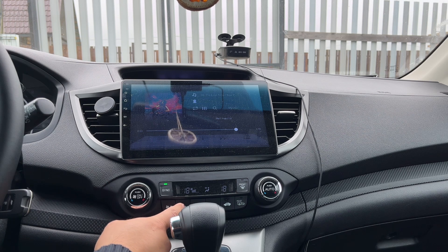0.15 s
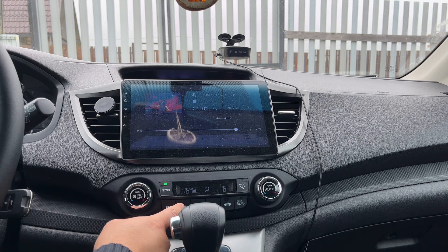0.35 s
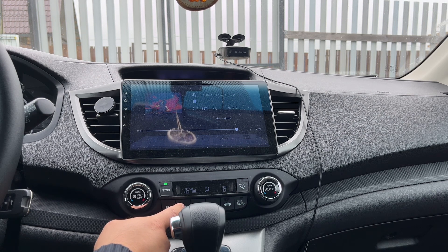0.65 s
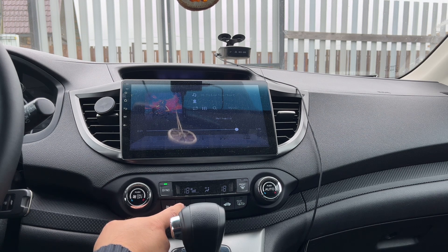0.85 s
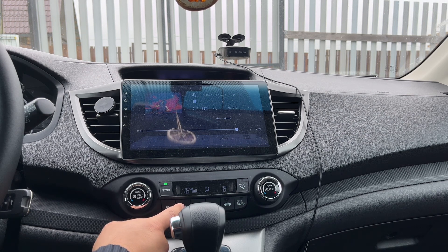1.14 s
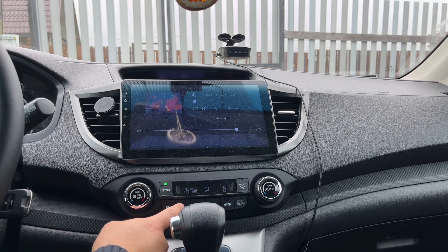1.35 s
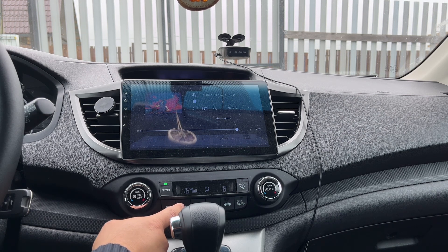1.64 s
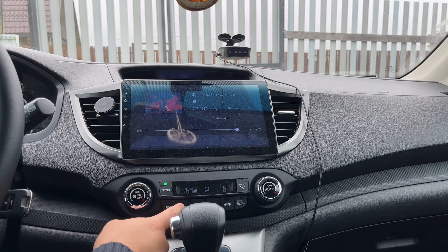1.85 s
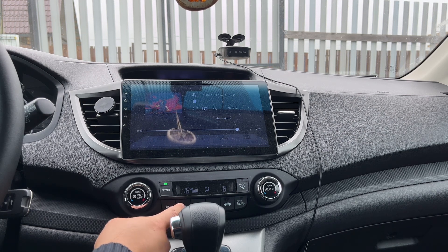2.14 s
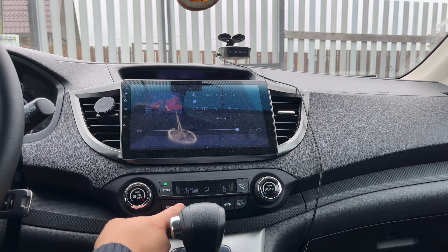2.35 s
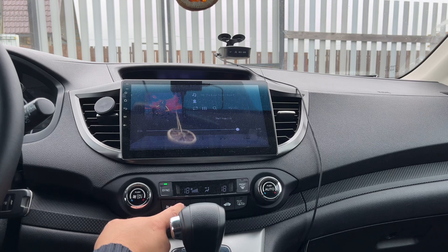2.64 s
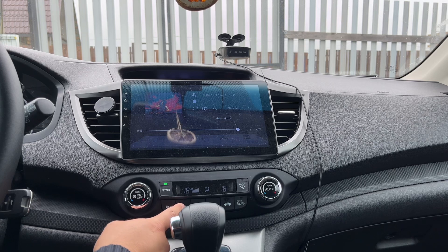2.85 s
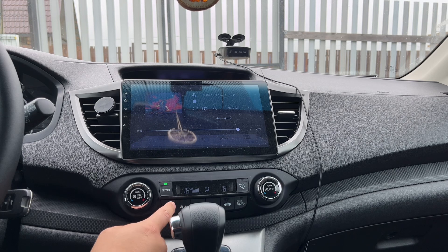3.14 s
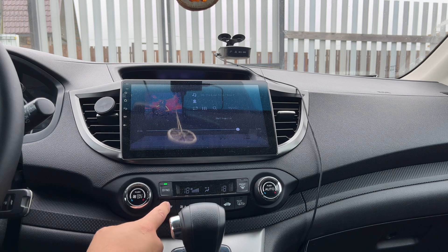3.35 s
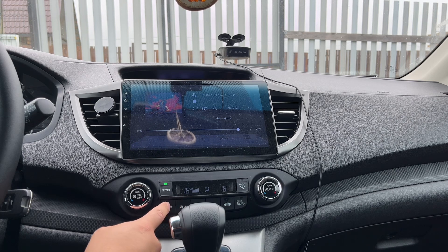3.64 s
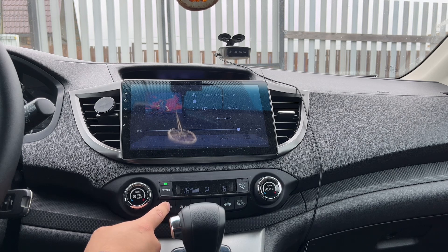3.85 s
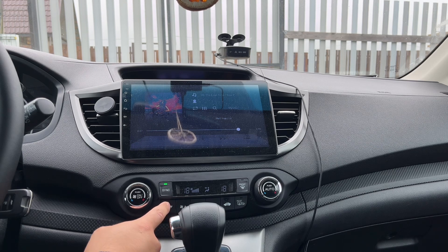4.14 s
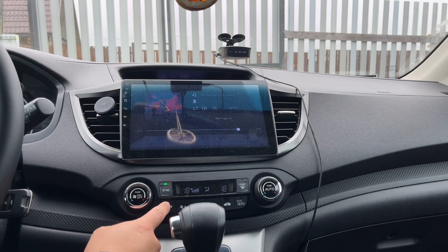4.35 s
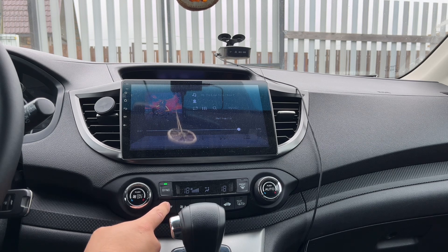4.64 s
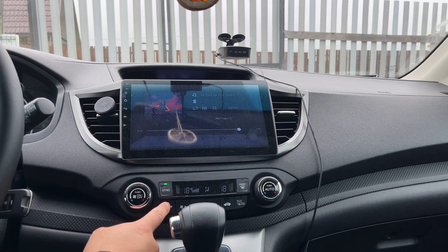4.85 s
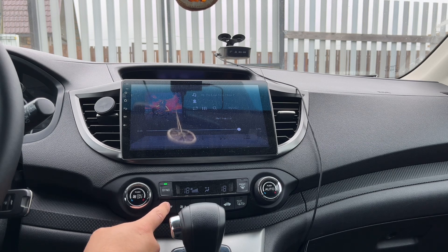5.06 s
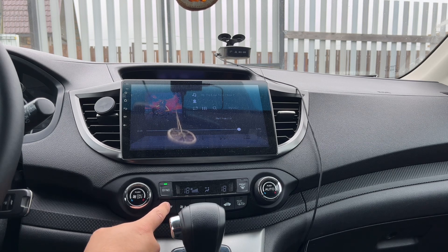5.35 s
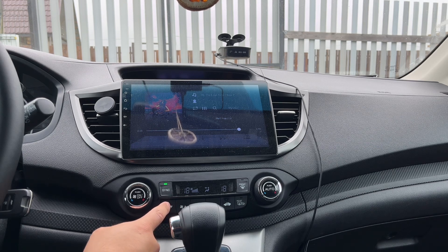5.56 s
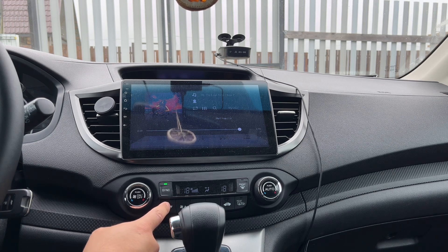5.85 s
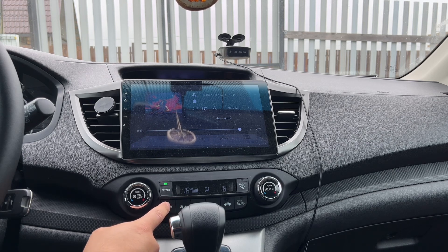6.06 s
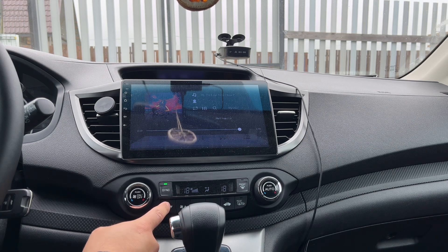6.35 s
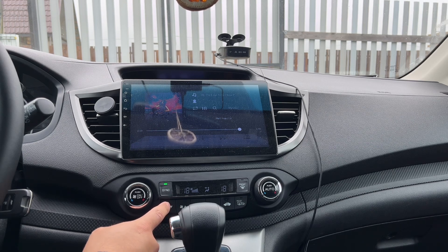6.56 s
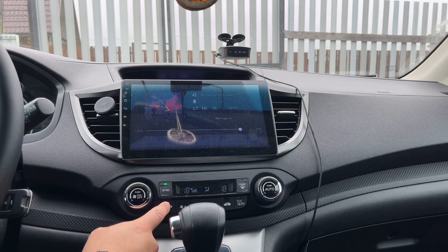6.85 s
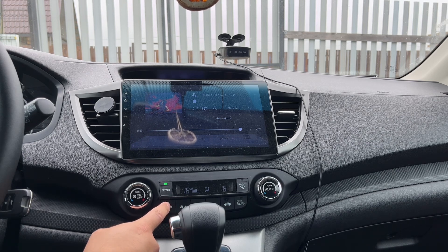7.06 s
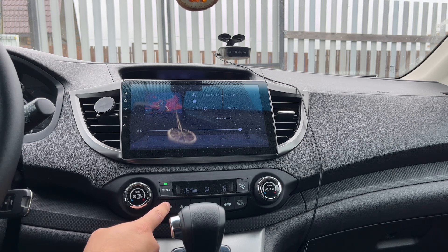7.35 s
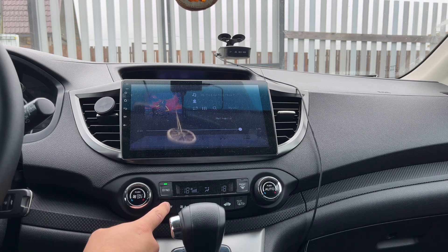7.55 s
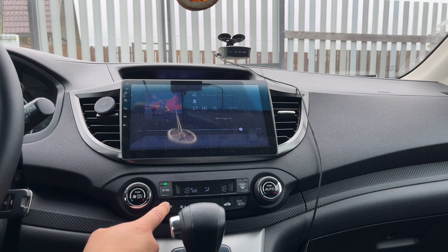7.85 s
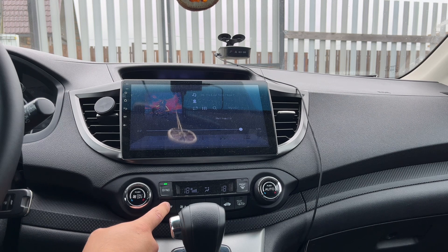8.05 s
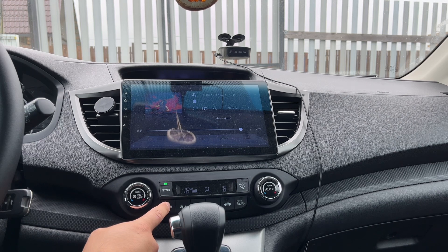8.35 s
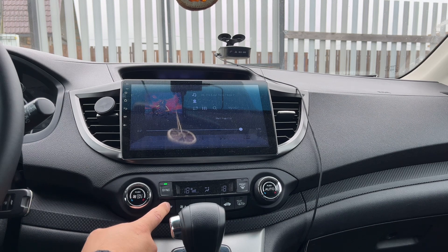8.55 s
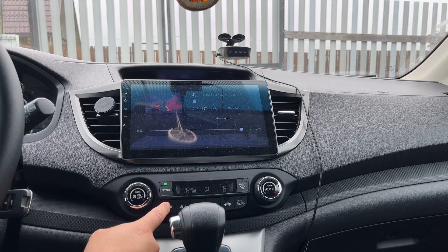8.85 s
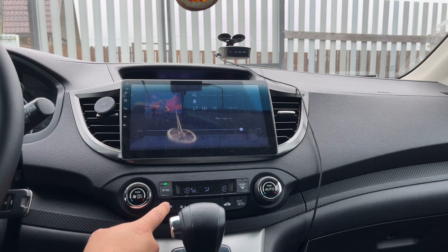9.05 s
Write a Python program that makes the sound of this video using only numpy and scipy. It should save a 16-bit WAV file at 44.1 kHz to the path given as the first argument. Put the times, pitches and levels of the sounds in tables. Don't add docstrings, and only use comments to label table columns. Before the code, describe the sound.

Close inside a parked car with the windows shut, a dashboard fan climbs quickly through three settings. Rushing air from the vents grows louder and brighter, with low, irregular gusts thumping in the cabin and a faint motor hum beneath. After a few seconds at full blast a tiny button click is heard, and the fan slows in two steps. Stereo microphone near the left vents; dull murmur outside.

```python
import sys
import numpy as np
from scipy import signal
from scipy.fft import rfft, irfft
from scipy.io import wavfile
from scipy.ndimage import uniform_filter1d

SR = 44100
rng = np.random.default_rng(int(sys.argv[2]) if len(sys.argv) > 2 else 0)


def how_loud(loudness_db):
    steps = np.asarray(loudness_db, float) / 20
    return 10 ** steps


def pcm_store(signal):
    levels = np.round(np.clip(np.atleast_2d(signal), -1, 1) * 32767)
    wavfile.write(sys.argv[1], SR, levels.astype(np.int16).T)


N = 405719


def evened(x):
    return x / np.sqrt(np.mean(x ** 2) + 1e-20)


def smoothed(x, width, axis=-1):
    width = int(width)
    return uniform_filter1d(uniform_filter1d(x, width, axis=axis), width, axis=axis)


def drift(count, width):
    return evened(smoothed(rng.standard_normal(count), width))


def read(points, hz):
    f, value = np.transpose(points)
    return np.interp(np.log(hz + 1), np.log(f + 1), value)


# frequency in Hz, likeness from 0 to 1.
SAME = [(40, .975), (110, .97), (330, .92), (410, .25), (560, .55), (800, .55), (1150, .1), (1400, .55),
        (1750, .85), (3300, .7), (3800, .45), (4500, .68), (7000, .58), (7900, .94), (9000, .92),
        (10600, .8), (11500, .95), (13000, .93), (14000, .8)]
# frequency in Hz, lead of the left in radians.
LEAD = [(330, .15), (520, 5.8), (1230, 5.8), (1400, 9.4), (1620, 9.8), (1750, 12.6), (3000, 13.5),
        (4900, 13.1), (7200, 11.1), (8050, 9.7), (8900, 9.2), (11000, 6.7), (13000, 5.9), (15200, 3.2)]
# frequency in Hz, left minus right in dB.
TILT = [(40, .7), (110, 1.6), (235, .9), (290, 3), (500, 5), (600, 3), (850, 5.6), (1000, 2), (1170, 4),
        (1400, -1.5), (1900, 1.1), (3000, 1.2), (4600, 4.5), (6500, .1)]


def ports(left, other, hz):
    same = np.clip(read(SAME, hz), 0, 1)
    shared = same * left * np.exp(-1j * read(LEAD, hz))
    right = shared + np.sqrt(1 - same ** 2) * other
    half_tilt_db = read(TILT, hz) / 2
    return np.array([left * how_loud(half_tilt_db), right * how_loud(-half_tilt_db)])


def noise(db, frames, size):
    a, b, c, d = rng.standard_normal((frames, size // 2 + 1, 4)).T
    hz = np.fft.rfftfreq(size, 1 / SR)[:, None]
    return ports(a + 1j * b, c + 1j * d, hz) * how_loud(db)


def overlap_add(spectra, size, hop):
    return signal.istft(spectra, nperseg=size, noverlap=size - hop)[1]


START_HZ, FULL_HZ = 29, 45.75
LAG_S = .15
# time in seconds, shaft speed the motor is sent to in Hz.
SETTINGS = [
    (.17, 36.1),
    (1.18, 40.85),
    (2.06, 45.75),
    (6.82, 40.85),
    (8.52, 35.9),
]


def shaft_hz(t):
    hz, before = START_HZ + 0 * t, START_HZ
    for s, sent in SETTINGS:
        hz = hz + (sent - before) * (1 - np.exp(-np.maximum(t - s, 0) / LAG_S))
        before = sent
    return hz


# frequency in Hz, level in dB.
AIR = [(30, -43), (45, -27.5), (80, -23), (125, -17.5), (150, -11.5), (180, -14), (240, -18), (600, -14.5),
       (1100, -10.5), (2700, -20.5), (5500, -24.5), (8000, -24), (13500, -29), (16000, -32)]
# frequency in Hz, width in Hz, height in dB.
DUCTS = [(330, 116, 4.5), (464, 24, 5.5), (530, 40, 1), (663, 42, -3), (753, 81, 4), (902, 100, 3),
         (1130, 74, -9), (1240, 32, 4.5), (1545, 86, 5), (1640, 230, 1), (2240, 68, 4), (2810, 180, 2.5),
         (3440, 110, 4), (4430, 1200, 4.5), (4840, 470, 3)]
# frequency in Hz, exponent (no unit).
GROWTH = [(40, 1.9), (75, 0.43), (170, 3.36), (500, 3.3), (3000, 3.8), (5000, 4.65), (7000, 5.2),
          (12000, 6.4)]
AIR_DB = -32


def air():
    size, hop = 2048, 512
    frames, hz = N // hop + 5, np.fft.rfftfreq(size, 1 / SR)
    colour_db = read(AIR, hz) - 20 * np.log10(hz + 1)
    for f, width, db in DUCTS:
        colour_db += db / (1 + (2 * (hz - f) / width) ** 2)
    patches = rng.standard_normal((frames, len(hz))).T
    patches = evened(uniform_filter1d(uniform_filter1d(patches, 20, axis=0), 6, axis=1))
    spectra = noise(colour_db[:, None] + 0.85 * patches, frames, size)
    full = overlap_add(spectra, size, hop)
    speed = shaft_hz(np.arange(frames) * hop / SR) / FULL_HZ
    grown = spectra * speed ** read(GROWTH, hz)[:, None] / np.sqrt(np.mean(full ** 2))
    return how_loud(AIR_DB) * overlap_add(grown, size, hop)[:, :N]


# frequency in Hz, level in dB per Hz.
CABIN = [(30, -48), (60, -8), (75, -5), (95, 0.5), (116, 1.5), (130, -4.5), (150, -20.5), (250, -120)]
# time in seconds, rms at the crest in dB, length in
# seconds.
SURGES = [(0.713, -33.5, 0.083), (1.176, -36, 0.1), (1.307, -32, 0.037), (1.403, -29.5, 0.034),
          (1.526, -32, 0.041), (1.686, -34, 0.085), (1.907, -37.5, 0.23), (2.11, -32, 0.089),
          (2.25, -28.5, 0.054), (2.372, -33, 0.034), (2.868, -28, 0.048), (3.01, -31.5, 0.068),
          (3.144, -33, 0.057), (3.255, -30.5, 0.083), (3.5, -32.5, 0.13), (3.695, -33.5, 0.067),
          (4.1, -32, 0.11), (4.306, -30.5, 0.054), (4.75, -30, 0.077), (4.95, -30, 0.088),
          (5.1, -30.5, 0.17), (5.352, -32.5, .1), (5.513, -31.5, 0.11), (5.986, -30.5, 0.071),
          (6.49, -31, 0.063), (6.843, -34, 0.032), (6.997, -33, 0.14), (7.42, -34, 0.068), (7.8, -36, 0.16),
          (8.45, -30, 0.054)]
LULL_DB, LULL_POWER, LULL_WANDER_DB = -35.5, 1.68, 2


def boom():
    size, hop = 8192, 2048
    frames, hz, t = N // hop + 5, np.fft.rfftfreq(size, 1 / SR), np.arange(N) / SR
    lean = (FULL_HZ / shaft_hz(np.arange(frames) * hop / SR)) ** 0.3
    spectra = noise(read(CABIN, np.outer(hz, lean)), frames, size)
    ring = overlap_add(spectra, size, hop)[:, :N]
    own_power = smoothed(ring.mean(0) ** 2, 2600)
    lull = how_loud(LULL_DB + LULL_WANDER_DB * drift(N, 2500)) * (shaft_hz(t) / FULL_HZ) ** LULL_POWER
    surges = sum(how_loud(db) ** 2 * np.exp(-(2 * (t - s) / length) ** 2) for s, db, length in SURGES)
    return ring * np.sqrt((lull ** 2 + surges) / (own_power + 1e-20))


# multiple of shaft speed (no unit), wavering in dB, left minus right in dB.
ORDERS_DB = [
    (1, 1.2, .8),
    (12, 1.0, 1.5),
    (24, 2.0, 5.0),
]
# frequency in Hz, rms in dB.
DASH = [(30, -56), (36, -50), (43, -52), (45.75, -42), (433, -66), (490, -61), (549, -53), (760, -70),
        (865, -60), (980, -67), (1100, -70)]
LOAD_DB_PER_HZ_S = .25


def motor():
    steady_hz = shaft_hz(np.arange(N) / SR)
    hz = steady_hz * (1 + .0012 * drift(N, 9000))
    turns = np.cumsum(hz) / SR
    load_db = LOAD_DB_PER_HZ_S * uniform_filter1d(np.gradient(steady_hz) * SR, 2000)
    out = np.zeros((2, N))
    for k, waver_db, tilt_db in ORDERS_DB:
        level_db = read(DASH, k * hz) + load_db + waver_db * drift(N, 4000)
        level_db = level_db + np.array([[.5], [-.5]]) * tilt_db
        out += how_loud(level_db) * np.sqrt(2) * np.sin(2 * np.pi * k * turns)
    return out


# frequency in Hz, level in dB per Hz.
OUTSIDE = [(60, -8), (250, -0.5), (700, -7), (1500, -18), (4000, -38), (8000, -73)]
OUTSIDE_DB = -52


def outside():
    size, hop = 2048, 1024
    colour_db = read(OUTSIDE, np.fft.rfftfreq(size, 1 / SR))[:, None]
    spectra = noise(colour_db, N // hop + 5, size)
    return how_loud(OUTSIDE_DB) * evened(overlap_add(spectra, size, hop)[:, :N])


TICK_SAME = .55
# start in seconds, peak in dB, centre in Hz, width in Hz, 60 dB decay in seconds.
TICKS = [
    (2.9762, -58, 11000, 2500, .014),
    (6.7, -45, 12600, 4200, .008),
    (6.7008, -50, 5200, 1800, .008),
    (6.7018, -54, 9500, 2000, .018),
    (6.7032, -49, 5050, 700, .014),
    (6.704, -61, 11500, 5000, .035),
]


def button():
    count = 3000
    out, t = np.zeros((2, N)), np.arange(count) / SR
    hz = np.fft.rfftfreq(count, 1 / SR)
    for s, db, centre_hz, width_hz, t60 in TICKS:
        near, other = rng.standard_normal((2, count))
        far = TICK_SAME * near + np.sqrt(1 - TICK_SAME ** 2) * other
        band = 1 / (1 + (2 * (hz - centre_hz) / width_hz) ** 4)
        burst = evened(irfft(rfft(np.array([near, far])) * band))
        envelope = how_loud(db - 60 * t / t60) * np.minimum(t / 0.00027, 1)
        start = round(s * SR)
        out[:, start:start + count] += envelope * burst
    return out


def scene():
    return air() + boom() + motor() + outside() + button()


def low_pass(x):
    return signal.sosfilt(signal.butter(12, 15690, fs=SR, output="sos"), x)


def record(dry):
    dry = dry * np.minimum(np.arange(N) / 60, 1)
    cut = signal.sosfilt(signal.butter(7, 37, "high", fs=SR, output="sos"), dry)
    return low_pass(cut)


dry = scene()
out = record(dry)
pcm_store(out)
```